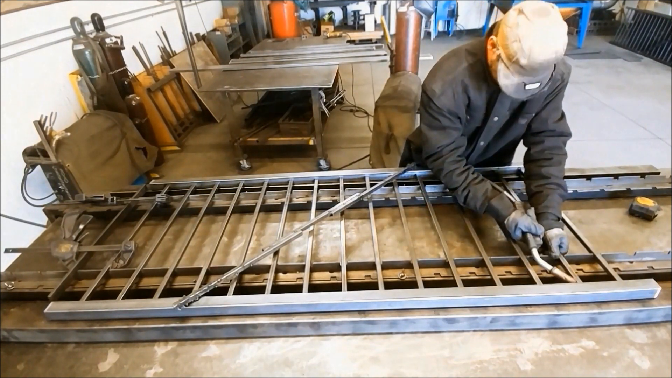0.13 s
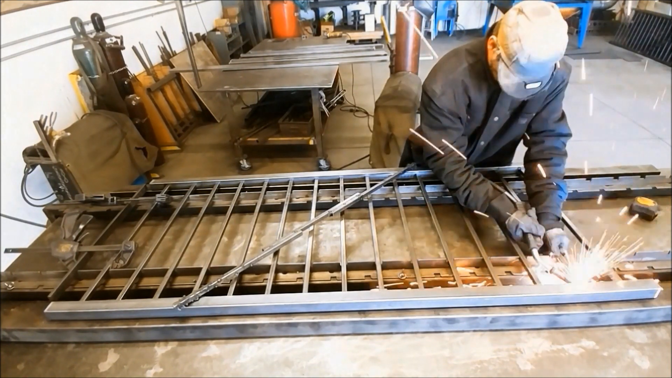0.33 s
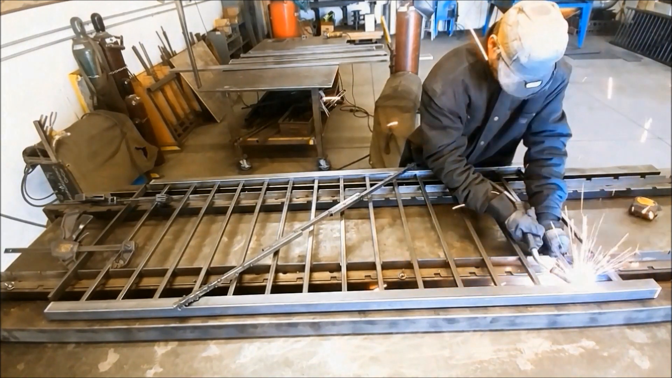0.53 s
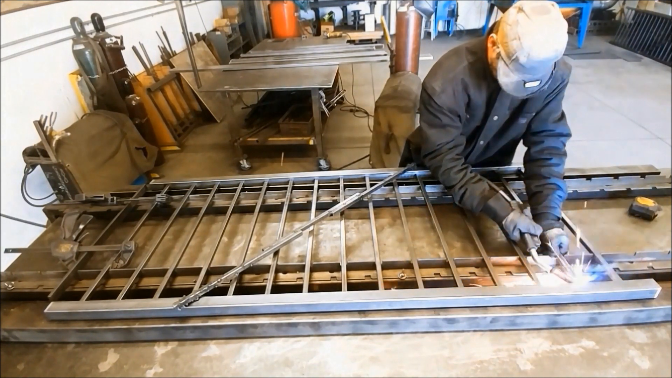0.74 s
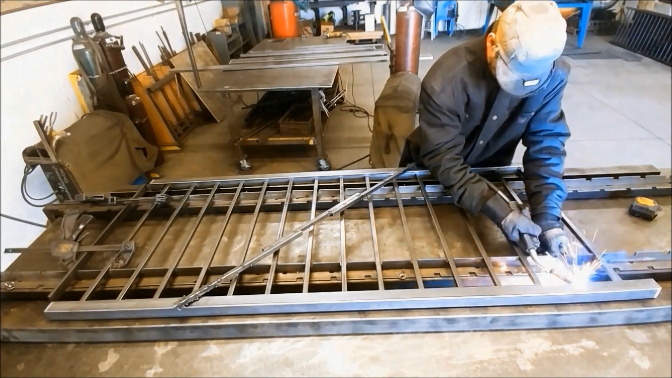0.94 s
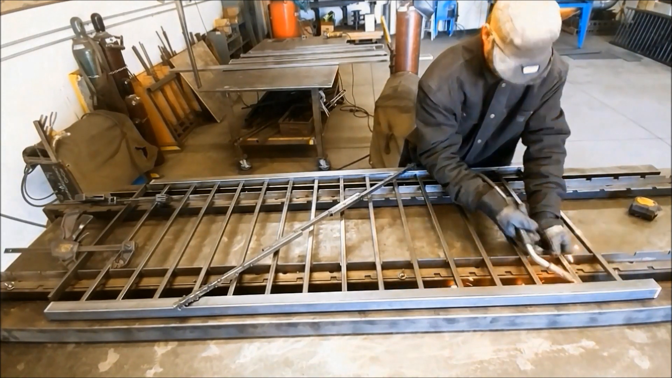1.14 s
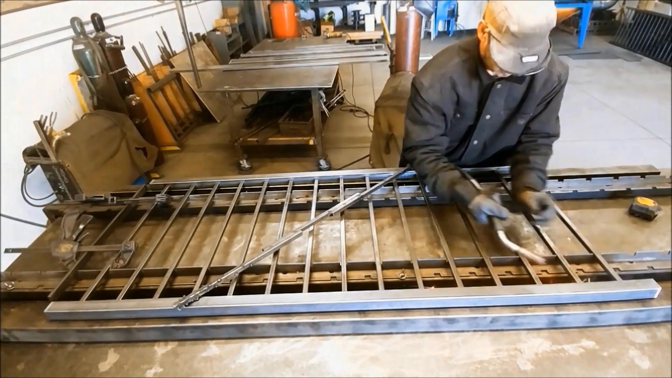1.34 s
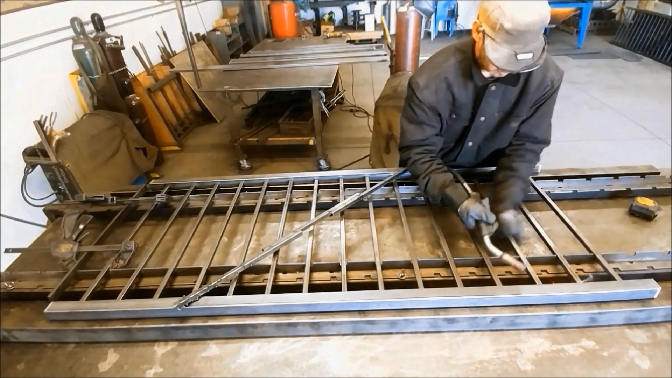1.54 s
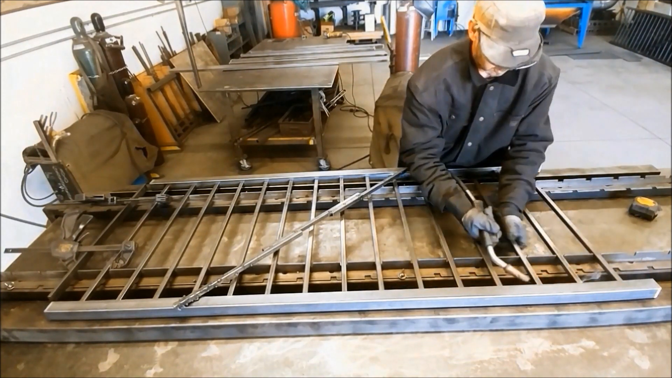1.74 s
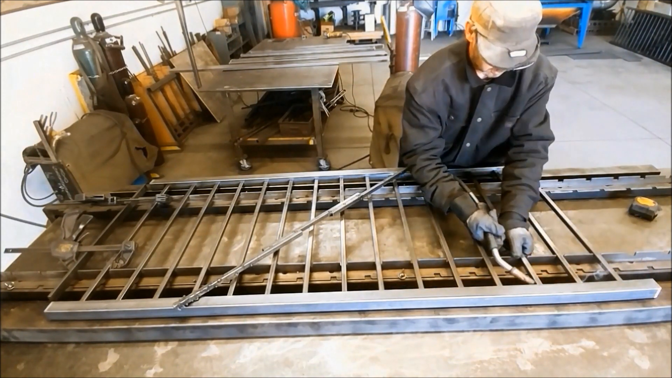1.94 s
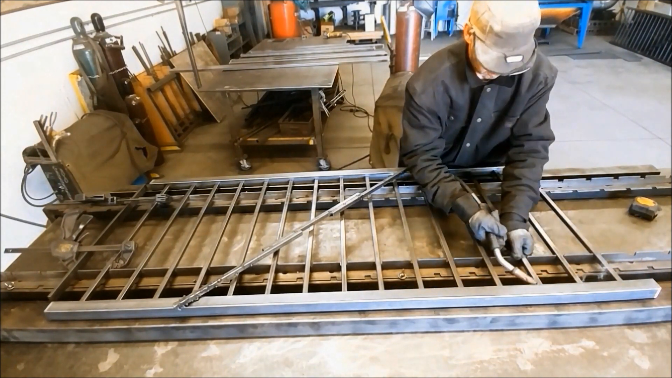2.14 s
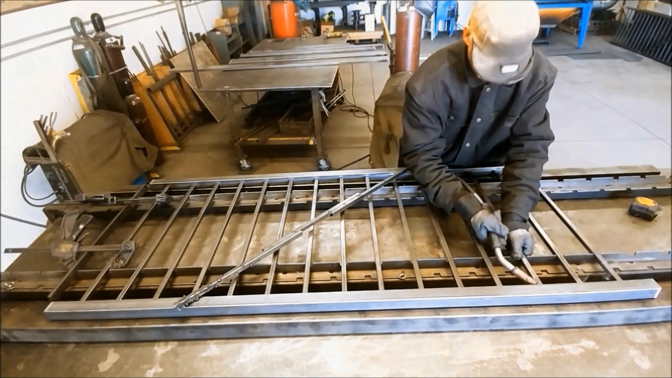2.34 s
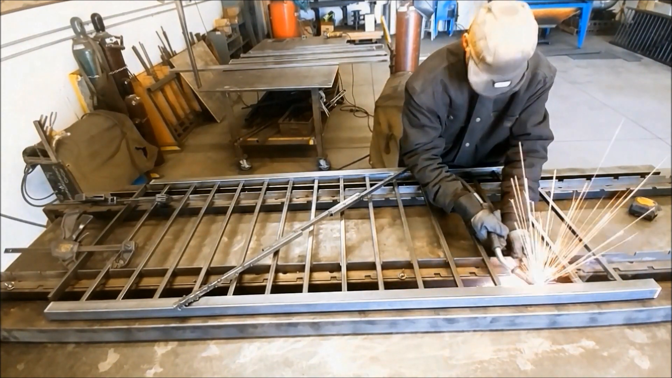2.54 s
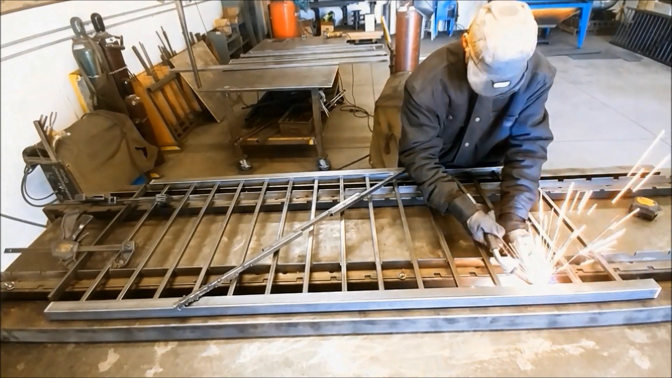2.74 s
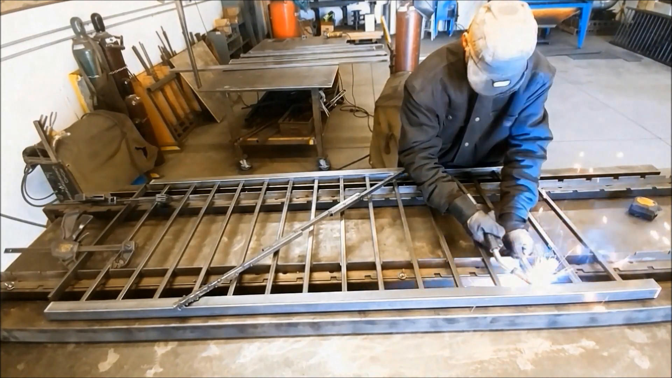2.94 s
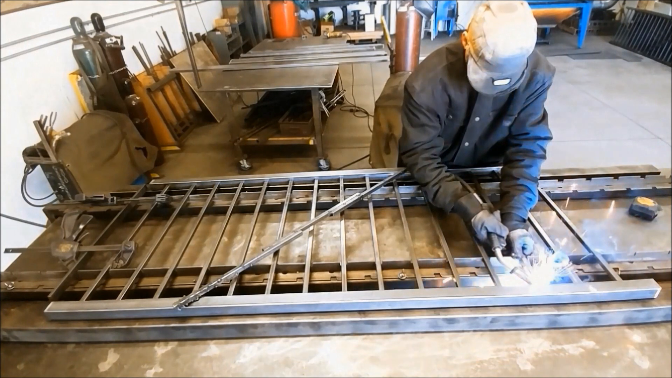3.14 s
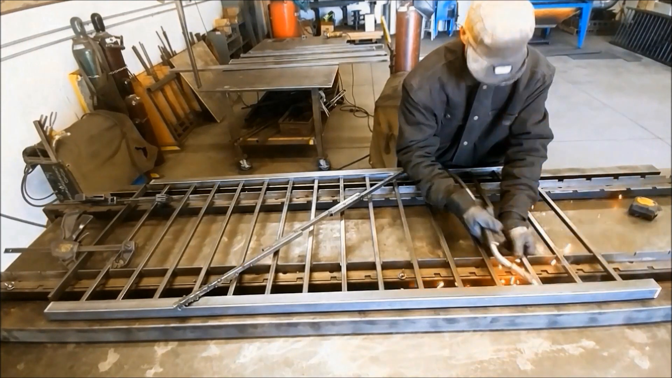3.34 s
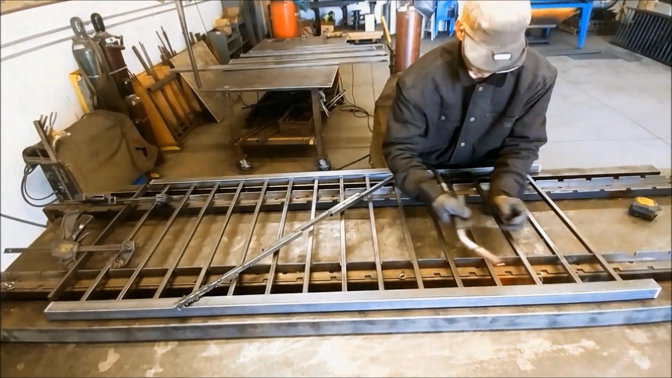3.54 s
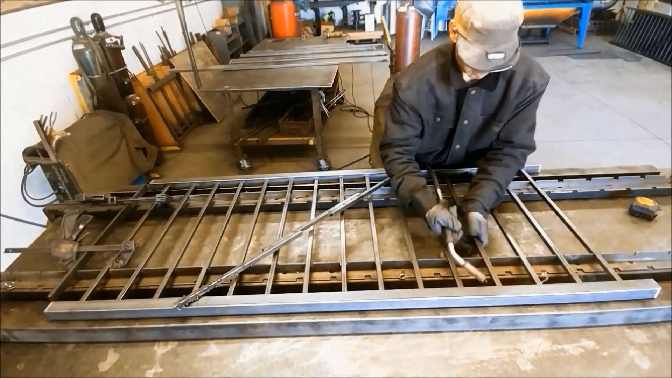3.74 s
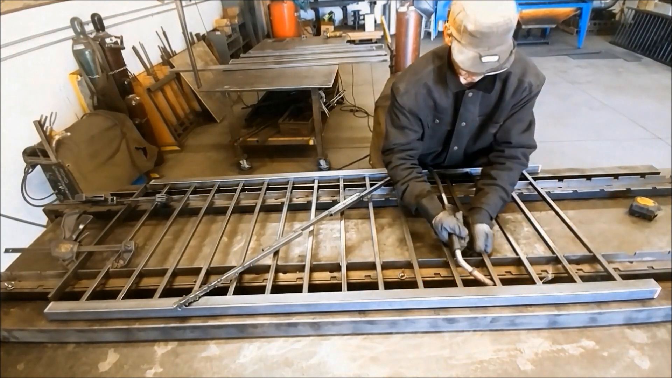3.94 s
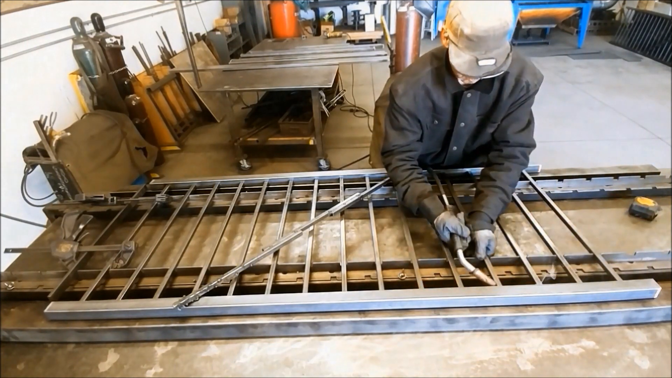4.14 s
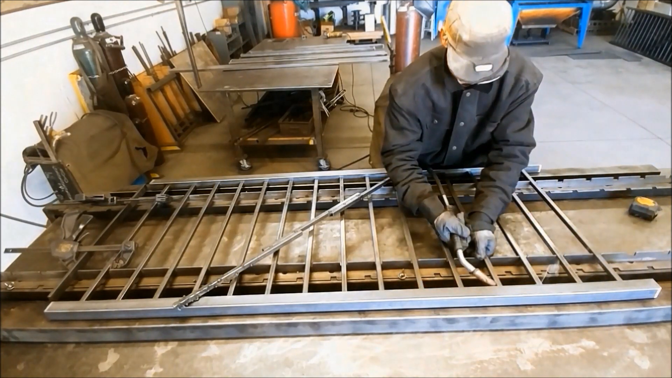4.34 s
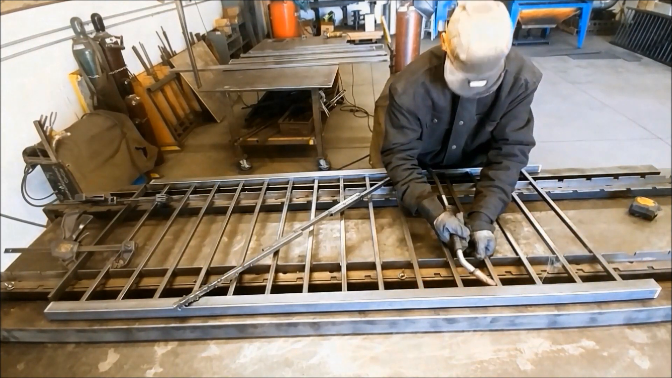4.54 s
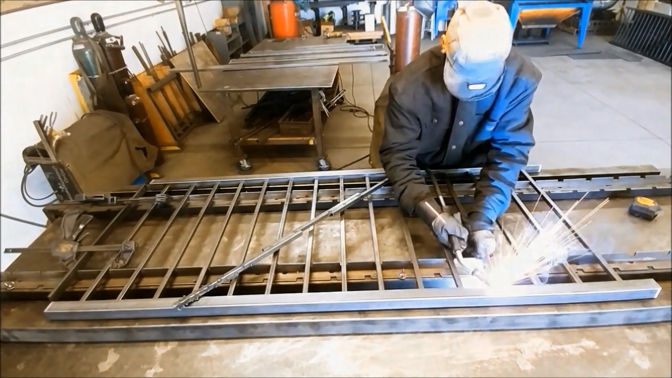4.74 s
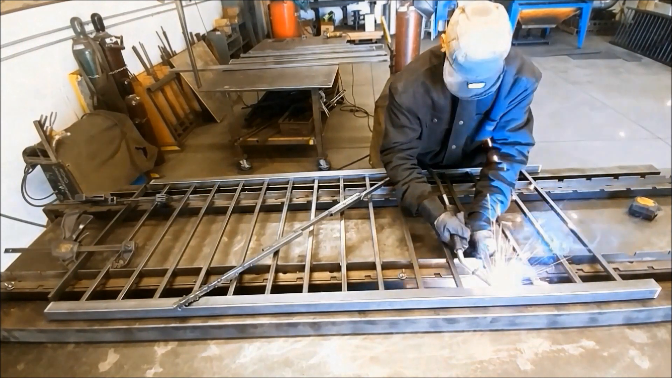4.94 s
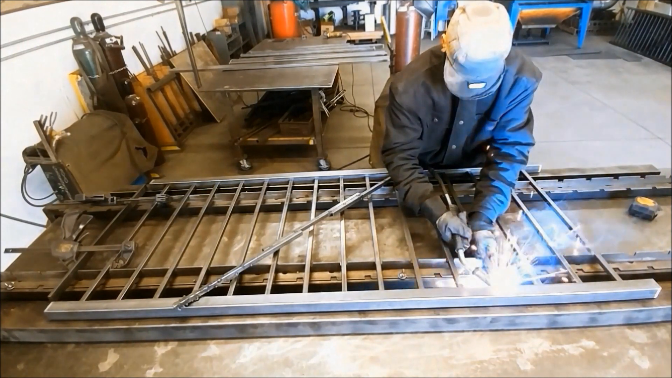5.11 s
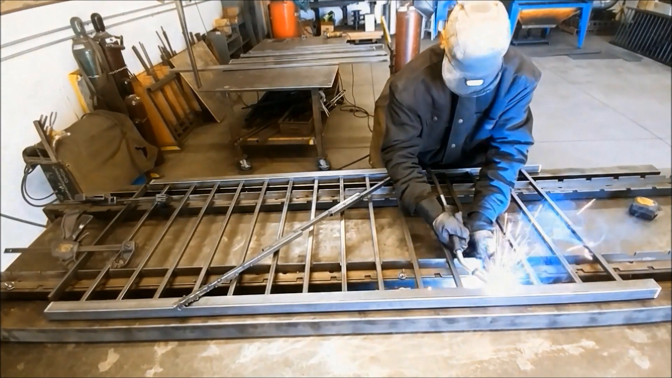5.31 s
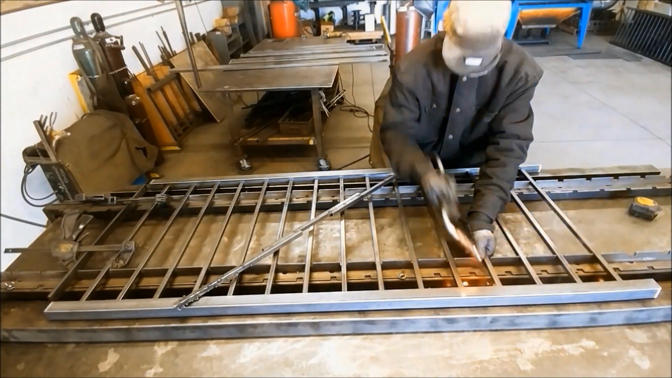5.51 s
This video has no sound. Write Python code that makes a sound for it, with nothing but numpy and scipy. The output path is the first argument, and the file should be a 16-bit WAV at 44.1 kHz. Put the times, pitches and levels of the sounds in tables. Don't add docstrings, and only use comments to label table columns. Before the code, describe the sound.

In a large, hard-walled workshop, a welding gun trigger ticks, gas hisses briefly and an arc strikes with a snap, spitting unevenly before settling into a fast buzzing crackle. It cuts off and a steel part clacks. Two more welds follow, with a softer clack after the second. Stereo phone microphone nearby, arc brighter and stronger on the right, over faint rumble.

```python
import sys
import numpy as np
from scipy import signal
from scipy.fft import rfft, irfft, next_fast_len
from scipy.io import wavfile
from scipy.ndimage import uniform_filter1d

SR = 44100
rng = np.random.default_rng(int(sys.argv[2]) if len(sys.argv) > 2 else 0)


def dump_mix(stems):
    frames = np.atleast_2d(stems).T
    limited = np.clip(frames, -1, 1)
    pcm = np.round(limited * 32767).astype(np.int16)
    wavfile.write(sys.argv[1], SR, pcm)


def linear_from_db(decibels):
    return 10 ** (np.asarray(decibels, float) / 20)


N = 245636
TIME = np.arange(N) / SR
SILENT_DB = -140.


def along(table, hz):
    points = np.array(table, float)
    return np.interp(np.log(hz + 1), np.log(points[:, 0] + 1), points[:, 1])


def colour(x, table, share=0.93, tilt_db=0.):
    size = 2 ** 11
    hz = np.fft.rfftfreq(size, 1 / SR)
    response_db = share * along(table, hz) + tilt_db * np.log2(hz / 3000 + 0.45)
    ceps = irfft(response_db * np.log(10) / 20)
    ceps[1:size // 2] *= 2
    ceps[size // 2 + 1:] = 0
    return signal.oaconvolve(x, irfft(np.exp(rfft(ceps))))[:N]


def band_level(x, lo_hz, hi_hz):
    band = signal.butter(4, [lo_hz, hi_hz], "bandpass", fs=SR, output="sos")
    return 1 / np.sqrt(np.mean(signal.sosfilt(band, x) ** 2))


def walk(rate):
    k = int(SR / rate)
    held = np.repeat(rng.standard_normal(N // k + 1), k)
    return 1.43 * uniform_filter1d(held, k)[:N]


def bursts(times, gains, rise_s, fall_s):
    spikes = np.bincount((np.asarray(times) * SR).astype(int), gains, N)[:N]
    t = np.arange(-SR // 8, SR // 8 + 1) / SR
    shape = np.exp(np.where(t < 0, t / rise_s, -t / fall_s))
    return signal.oaconvolve(spikes, shape, "same")


def curve(tables, column):
    out = np.full(N, SILENT_DB)
    for table in map(np.array, tables):
        inside = (TIME >= table[0, 0]) & (TIME < table[-1, 0])
        out[inside] = np.interp(TIME[inside], table[:, 0], table[:, column])
    return out


# frequency in Hz, level in dB.
RUMBLE_TONE = [(20, -38), (48, -22), (75, -6.5), (105, -10), (135, 0), (175, -15), (280, -9.5),
               (465, -19.5), (800, -21), (1100, -28.5), (2000, -39.5), (5000, -50.5), (8500, -49.5),
               (11000, -54)]
# frequency in Hz, likeness from 0 to 1.
RUMBLE_LIKENESS = [(60, 1), (130, 1), (290, 1), (640, 0.49), (1410, 0), (3100, 0.05), (6820, 0),
                   (15000, 0.18)]


def rumble():
    size = next_fast_len(N + SR)
    hz = np.fft.rfftfreq(size, 1 / SR)
    mid, side = rfft(rng.standard_normal((2, size))) * linear_from_db(along(RUMBLE_TONE, hz))
    alike = np.clip(along(RUMBLE_LIKENESS, hz), 0, 1)
    mid = irfft(mid * np.sqrt(1 + alike), size)[:N]
    side = irfft(side * np.sqrt(1 - alike), size)[:N]
    out = np.array([(mid + side) * linear_from_db(-3.5), mid - side]) * linear_from_db(.7 * walk(4))
    return out * linear_from_db(-62) / np.sqrt(np.mean(out ** 2))


def rattle(events, body):
    out = 0
    for s, db, rise_s, fall_s, tilt_db in events:
        noise = rng.standard_normal(N) * linear_from_db(0.53 * walk(700))
        after = np.clip(TIME - s, 0, 1)
        shape = (1 - np.exp(-(after / rise_s) ** 2)) * np.exp(-after / fall_s)
        out = out + linear_from_db(db) * colour(shape * noise, body, tilt_db=tilt_db)
    return out


# start in seconds, level in dB, rise in seconds, decay in seconds, brightness in dB per octave.
TRIGGER_TICKS = [
    (.2275, -39, 0.0008, 0.02, -6),
    (2.457, -65.5, .001, 0.0034, 8),
    (4.117, -34, 0.0034, 0.019, -2.2),
    (4.581, -66.5, .001, 0.0017, 13.5),
    (4.616, -40.5, .003, 0.022, 3),
]
# frequency in Hz, level in dB.
TRIGGER_TONE = [(500, -10.5), (1500, -15), (3190, -8.5), (4100, -12), (4365, 3), (4650, -11), (5590, -11.5),
                (6600, -24.5), (8400, -5.5), (10500, -29.5), (12300, -22.5), (16000, -39.5)]


def trigger_ticks():
    return rattle(TRIGGER_TICKS, TRIGGER_TONE)


# valve opens in seconds, level in dB.
GAS_STARTS = [
    (0.26, -43.5),
    (2.484, -48.5),
    (4.607, -50.5),
]


def gas():
    rise_s, sag_db_per_s = 0.014, 66
    out = np.full(N, SILENT_DB)
    for (s, db), weld in zip(GAS_STARTS, WELD_CURVES):
        flowing = (TIME > s) & (TIME < weld[0][0])
        after = TIME[flowing] - s
        swell_db = 20 * np.log10(1 - np.exp(-(after / rise_s) ** 2))
        out[flowing] = db + swell_db - sag_db_per_s * after
    return out


def rings(s, hz, db, t60):
    after = np.clip(TIME - s, 0, 1)
    flutter_db = 2.5 * walk(140)
    rise = 1 - np.exp(-after * hz / 0.79)
    return linear_from_db(db - 60 * after / t60 + flutter_db) * rise * np.sin(2 * np.pi * hz * after)


# start in seconds, level in dB, frequency in Hz, time to fall 60 dB in seconds.
DULL_KNOCKS = [
    (0.262, -54, 310, 0.24),
    (.292, -51, 50.6, 0.22),
    (1.02, -48, 45, 0.17),
    (2.491, -47, 273, 0.11),
    (2.5505, -49, 500, 0.045),
    (2.564, -39.5, 600, 0.046),
    (4.614, -48, 298, 0.21),
    (4.694, -39, 54, 0.16),
    (4.78, -42, 60, 0.11),
]


def knocks():
    out = 0
    for s, db, hz, t60 in DULL_KNOCKS:
        left_db = -10 * (hz < 70)
        out = out + rings(s, hz, db, t60) * linear_from_db([[left_db], [0]])
    return out


# start in seconds, length in seconds, boost in dB.
FLARES = [(0.289, .063, 8), (0.373, 0.0076, 10.5), (0.416, 0.0282, 8), (0.452, .035, 6), (0.56, 0.019, -1),
          (.64, .02, 8), (0.683, 0.0069, 7), (.716, 0.013, -1), (0.761, 0.022, 10), (0.796, .037, 7),
          (0.86, 0.027, 6.5), (1.037, 0.014, 11.5), (1.09, .033, 10.5), (2.558, 0.056, 5.5),
          (2.651, .059, 7.5), (2.727, 0.068, 4), (2.816, 0.038, 3.5), (3.092, .03, 4), (3.178, 0.025, 5),
          (4.685, 0.05, 8.5), (4.767, 0.082, 5), (4.848, 0.033, 5.5), (4.932, 0.039, 5.5),
          (5.167, 0.0085, 7)]


def flares():
    rise_s, sag_per_s = .005, 1.1
    out = np.zeros(N)
    for start, length_s, db in FLARES:
        after = np.clip(TIME - start, 0, 1)
        out += db * (1 - np.exp(-after / rise_s)) * (1 - sag_per_s * after) * (after < length_s)
    return uniform_filter1d(out, size=70)


# time in seconds, peak in dB, low thump relative to the peak in dB.
HARD_RELIGHTS = [(0.2859, -23, -9.5), (0.401, -26.5, -2), (0.4496, -35, -8), (0.7115, -15, -19),
                 (0.7435, -24.5, -15), (1.012, -27.5, -11), (2.5519, -24, -6), (2.718, -31, -1.5),
                 (2.7895, -31, -9), (4.6915, -25, -7), (4.7688, -27.5, -4), (4.841, -28, -17)]
SETTLING_S = [
    .17,
    .26,
    .13,
]


def shorts(crackle_db, flare_db):
    gap_s, gap_spread = .0078, .27
    rows = [np.array(HARD_RELIGHTS)]
    for weld, settle_s in zip(WELD_CURVES, SETTLING_S):
        strike_s, end_s = weld[0][0], weld[-1][0]
        chance = rng.standard_normal((3, 200))
        s = strike_s + settle_s + np.cumsum(gap_s * np.exp(gap_spread * chance[0]))
        at = (np.minimum(s, end_s) * SR).astype(int)
        keep = (s < end_s) & (flare_db[at] < 1)
        peak_db = crackle_db[at] + 11 + 1.5 * chance[1]
        thump_db = -9 + 3 * chance[2]
        rows.append(np.array([s, peak_db, thump_db]).T[keep])
    return np.concatenate(rows).T


def burning(s):
    ones = np.ones(len(s))
    swell_db = 11 * bursts(s, ones, 0.0015, 0.0014)
    gap_db = 9 * bursts(s + 0.00183, ones, 0.00055, 0.0007)
    return linear_from_db(np.clip(swell_db - gap_db, -20, 12) + 1.5 * walk(300))


def spatter_bursts(burn):
    gap_chance, gain_chance = rng.standard_normal((2, 2000))
    times = np.cumsum(np.exp(0.56 * gap_chance) / 200)
    keep = times < TIME[-1]
    return burn * .6 + bursts(times[keep], linear_from_db(4 * gain_chance[keep]), .0003, .0005)


# time in seconds, sizzle between flares in dB, crackle relative to the sizzle in dB.
WELD_CURVES = [
    [(.284, -50.5, 4), (.33, -49, -2.5), (.4, -49.5, -1), (.55, -40, -1), (.8, -47.5, -4), (1., -47, 3),
     (1.125, -61, 15.5)],
    [(2.551, -46.5, -9.5), (2.6, -50, -11), (2.65, -54.5, -14), (2.69, -47.5, -16), (2.73, -42.5, -5),
     (2.85, -38.5, -10.5), (3.1, -41.5, -4), (3.295, -41, -4.5)],
    [(4.69, -52, 5.5), (4.72, -50, 9), (4.78, -51.5, 10), (4.9, -41, -3.5), (5.09, -39, -10), (5.3, -46, 2),
     (5.372, -47.5, 3)],
]
# frequency in Hz, level in dB.
PORT_TONE = [(1180, -44), (2000, -16), (2460, -10.5), (3520, -10.5), (3870, -11.5), (4400, -6),
             (5100, -5.5), (5750, -10), (6760, -9), (8330, 2), (9330, 0), (10500, -10.5), (12900, -9.5),
             (14700, -7), (15500, -12), (16000, -20.5)]
# frequency in Hz, level in dB.
RAIL_TONE = [(60, -8.5), (130, -12.5), (250, -5), (400, -6.5), (620, -2.6), (900, -5), (1100, -5),
             (1420, 2.5), (1750, 0), (2300, -3), (3500, -40.5)]


def arc():
    noise, scattered, crack, low_noise = rng.standard_normal((4, N))
    power_db = curve(WELD_CURVES, column=1)
    crackle_db = power_db + curve(WELD_CURVES, column=2)
    flare_db, gas_db = flares(), gas()
    s, peak_db, thump_db = shorts(crackle_db, flare_db)
    burn = burning(s)
    spatter = spatter_bursts(burn)

    sizzle = linear_from_db(power_db - 8 + 2.56 * flare_db) * burn + linear_from_db(gas_db - 4.5)
    unit = band_level(colour(noise, PORT_TONE), 4200, 13000)
    hiss = [unit * colour(sizzle * source, PORT_TONE, 1.12, tilt_db=2.5) for source in (noise, scattered)]

    snap = linear_from_db(crackle_db + 0.5 + 0.9 * flare_db) * spatter
    snap = snap + bursts(s, linear_from_db(peak_db + 4.0), 0.00009, 0.00047)
    spike = bursts(s, linear_from_db(peak_db - 4.7), .00002, .00003)
    pops = unit * colour(snap * crack + spike, PORT_TONE, tilt_db=1.5)

    thump = linear_from_db(crackle_db - 10) * spatter + linear_from_db(gas_db - 12.0)
    thump = thump + bursts(s, linear_from_db(peak_db + thump_db - 15.5), 0.00014, 0.0011)
    blow = 0.94 * bursts(s, linear_from_db(peak_db + thump_db), .00008, .00008)
    rail_unit = band_level(colour(noise, RAIL_TONE), 300, 2300)
    return hiss, pops + rail_unit * colour(thump * low_noise - blow, RAIL_TONE)


PATCH_CENTRES_HZ = [700, 1500, 2400, 3500, 5000, 6500, 13000]


def patchy(sounds):
    out = np.array(sounds)
    for hz in PATCH_CENTRES_HZ:
        part = signal.lfilter(*signal.iirpeak(hz, 2.5, fs=SR), sounds)
        out = out + (linear_from_db(1.2 * walk(45)) - 1) * part
    return out


# start in seconds, level in dB, rise in seconds, decay in seconds, brightness in dB per octave.
STEEL_CLACKS = [
    (1.571, -28.5, 0.005, 0.028, 5),
    (3.711, -34, 0.0096, 0.027, 2),
]
# frequency in Hz, level in dB.
STEEL_TONE = [(200, -36), (400, 13.5), (1000, 16.5), (2000, 15), (4000, 10), (6000, 4), (8500, -3),
              (11000, -12.5), (16000, -19)]


def clacks():
    return colour(rattle(STEEL_CLACKS, STEEL_TONE), PORT_TONE[1:], 0.31)


# frequency in Hz, time to fall 60 dB in seconds.
HALL_RING = [(125, 1.5), (250, 0.82), (500, 1.23), (1000, 1.08), (2000, 0.69), (4000, 0.55), (8000, 0.38),
             (16000, 0.28)]


def hall():
    t, hz = TIME[:SR], np.fft.rfftfreq(SR, 1 / SR)
    spectra, out = rfft(rng.standard_normal((2, SR))), 0
    for centre_hz, t60 in HALL_RING:
        octave = np.clip(1 - np.abs(np.log2(hz / centre_hz + 1e-9)), 0, 1)
        out = out + irfft(spectra * octave, SR) * linear_from_db(-60 * t / t60)
    out = out * (1 - np.exp(-t / 0.024))
    return out / np.sqrt(np.sum(out ** 2, axis=1, keepdims=True))


def ports(right, left, tails, wet_db, balance, wet_shade, lag):
    wet = 0
    for k, tail in enumerate(tails):
        turn = np.cos(np.pi * (TIME / .9 + k / 3)) ** 2
        wet = wet + linear_from_db(wet_db) * signal.fftconvolve((turn * right)[None], tail, axes=1)[:, :N]
    shaded = colour(np.roll(left, lag), balance) + colour(wet[0], balance, wet_shade)
    return np.array([shaded, right + wet[1]])


# frequency in Hz, left minus right in dB.
ARC_BALANCE = [(60, -11), (110, 5.5), (200, -3), (380, 3.5), (700, -1.5), (1290, -3.5), (2380, -5.5),
               (4400, -8.5), (8120, -14.5), (15000, -24)]
# frequency in Hz, left minus right in dB.
STEEL_BALANCE = [(60, -9), (110, -5), (200, -7), (380, -1.5), (700, -4), (1290, -11), (2380, -12),
                 (4400, -20.5), (8120, -26), (15000, -23.5)]


def scene():
    tails = [hall() for _ in range(3)]
    (hiss, scattered), pops = arc()
    hiss, scattered, pops = patchy([hiss, scattered, pops])
    left = linear_from_db(-8) * (.3 * hiss + .95 * scattered) + linear_from_db(5) * pops
    echo = linear_from_db(-9) * np.roll(hiss + pops, int(.0136 * SR))
    out = ports(hiss + pops + echo, left + .5 * np.roll(echo, 90), tails, wet_db=-3.5,
                balance=ARC_BALANCE, wet_shade=1.0, lag=11)
    steel = clacks() + trigger_ticks()
    out = out + ports(steel, steel, tails, wet_db=-10.5, balance=STEEL_BALANCE, wet_shade=0.68, lag=8)
    return out + knocks() * linear_from_db([[-.6], [.6]]) + rumble()


def low_pass(x):
    return signal.sosfilt(signal.butter(12, 16830, fs=SR, output="sos"), x)


def record(dry):
    notch_hz, notch_width_hz, limit = 10600, 1100, .08
    notch = signal.iirpeak(notch_hz, notch_hz / notch_width_hz, fs=SR)
    port = dry - .7 * signal.lfilter(*notch, dry)
    rounded = limit * np.tanh(port / limit)
    top = signal.ellip(8, .2, 45, 15900, fs=SR, output="sos")
    return low_pass(signal.sosfilt(top, rounded))


dry = scene()
out = record(dry)
dump_mix(out)
```